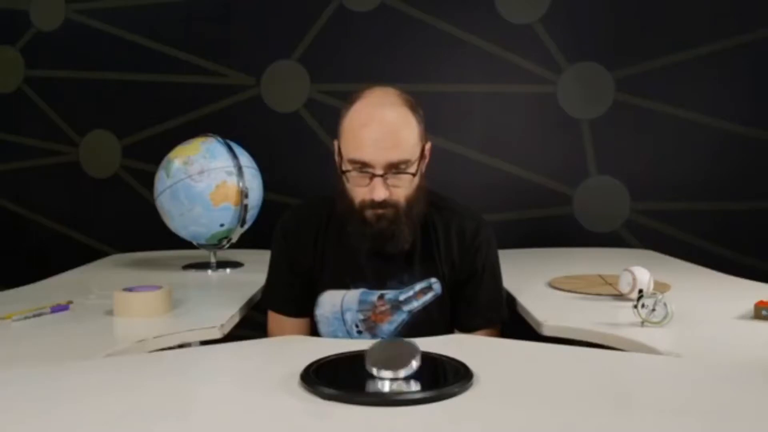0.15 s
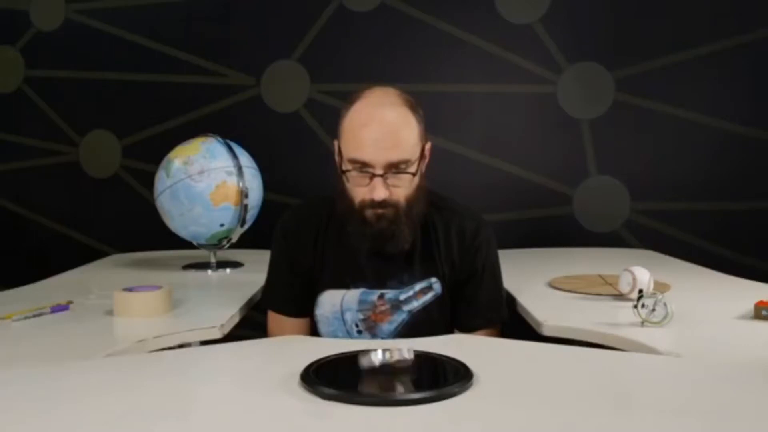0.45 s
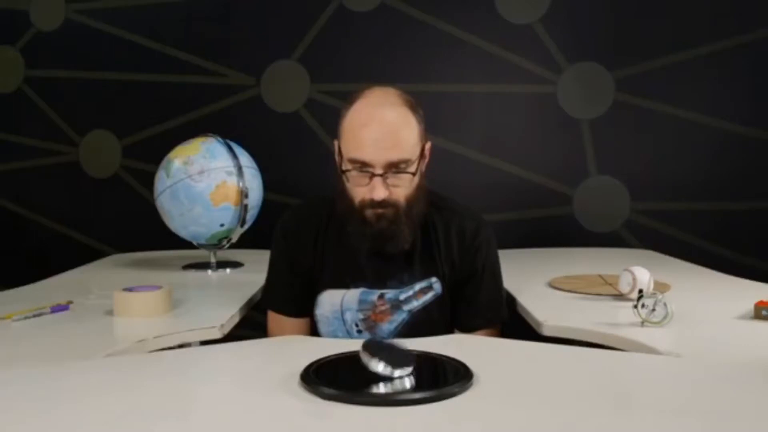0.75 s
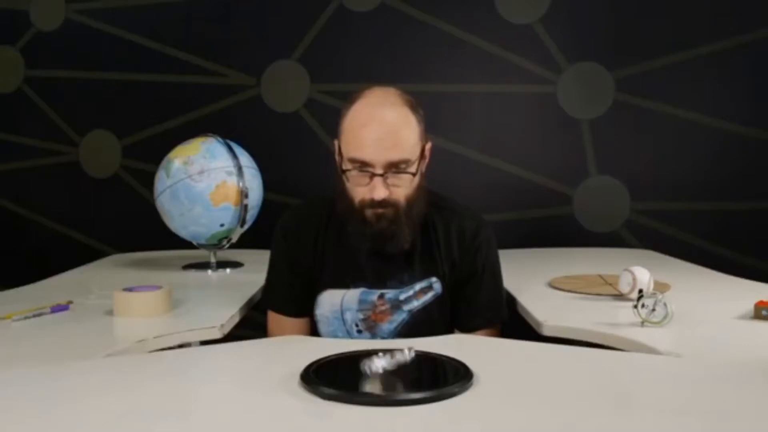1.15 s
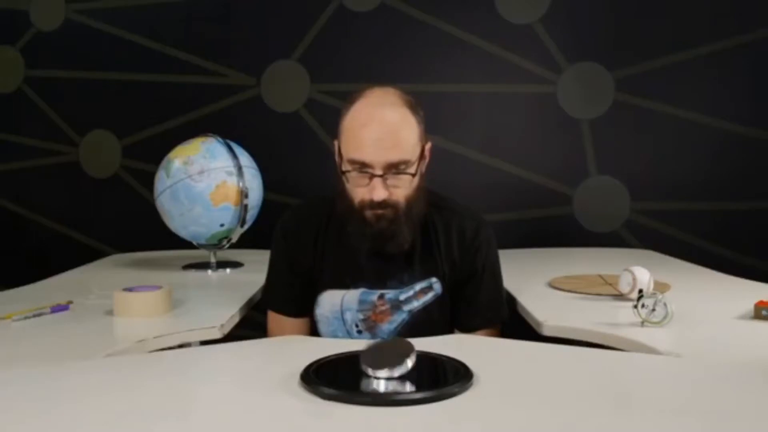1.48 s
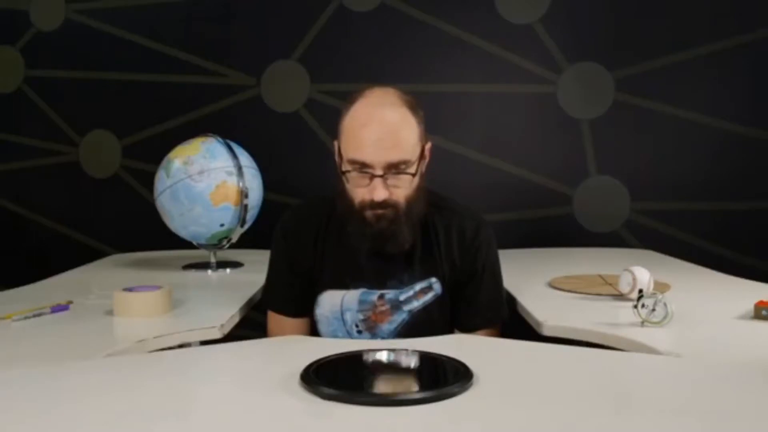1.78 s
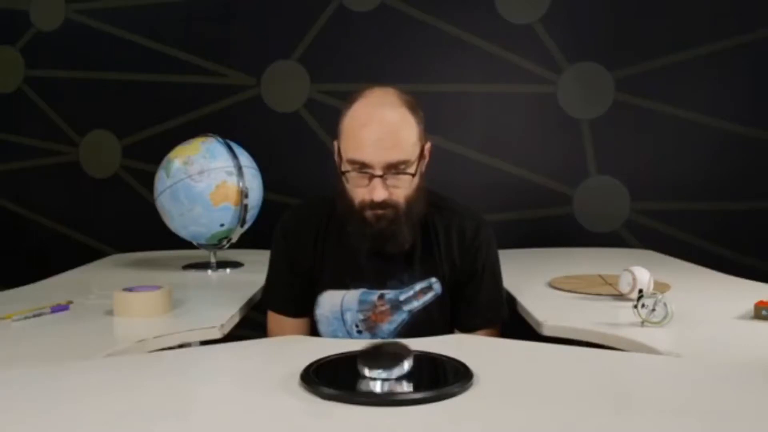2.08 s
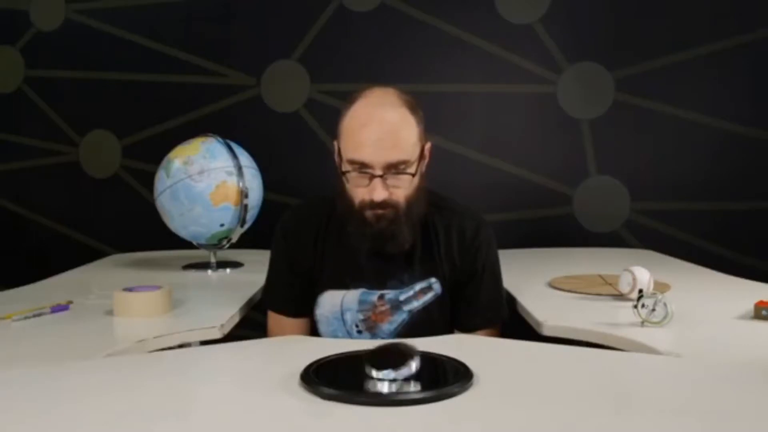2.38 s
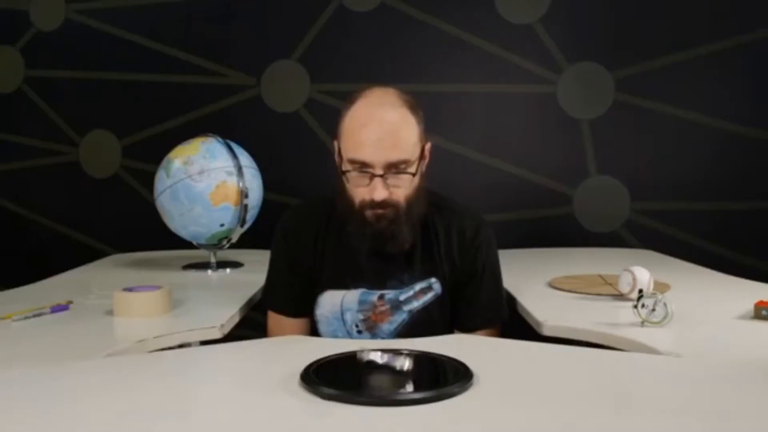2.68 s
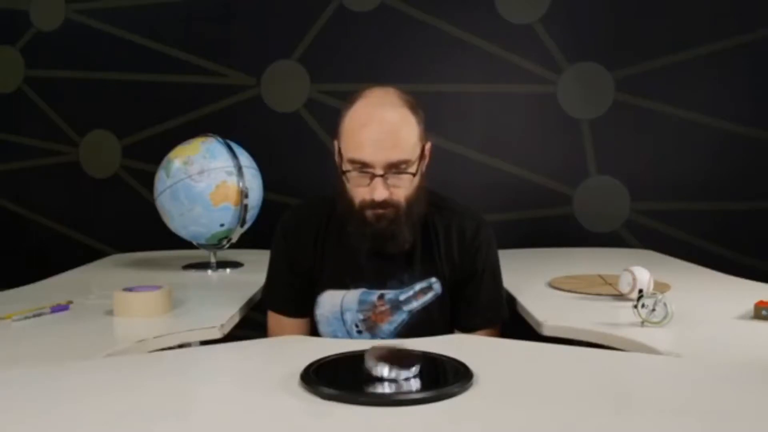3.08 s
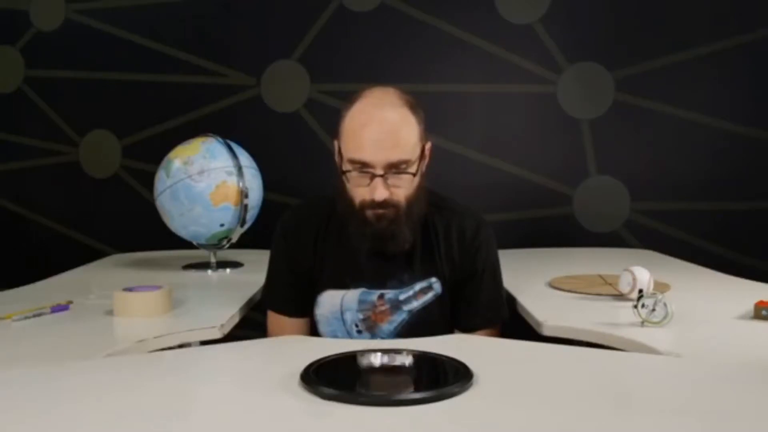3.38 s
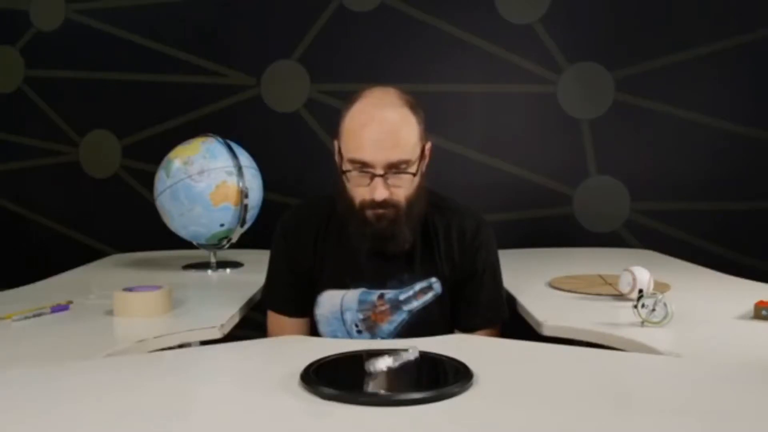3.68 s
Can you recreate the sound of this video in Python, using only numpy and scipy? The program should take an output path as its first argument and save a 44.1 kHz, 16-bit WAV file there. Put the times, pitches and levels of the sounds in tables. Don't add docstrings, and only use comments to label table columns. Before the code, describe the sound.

A heavy metal disc wobbles on a shallow dish, clattering rapidly and evenly over a grainy rolling rumble.

```python
import sys
import numpy as np
from scipy import signal
from scipy.fft import rfft, irfft, next_fast_len
from scipy.io import wavfile

SR = 44100
rng = np.random.default_rng(int(sys.argv[2]) if len(sys.argv) > 2 else 0)


def file_out(sig):
    cols = np.atleast_2d(sig).T
    lim = np.clip(cols, -1, 1)
    pcm = np.round(lim * 32767).astype(np.int16)
    wavfile.write(sys.argv[1], SR, pcm)


def gain_from_db(level_db):
    decades = np.asarray(level_db, float) / 20
    return 10 ** decades


N = 169785

# (time [s], peak [dB], boom of the dish modes near 630 Hz [dB], brightness [dB], chink
# of the disc's 3 kHz modes [dB])
MAIN_KNOCKS = [(0.125, -16, -20, -2.5, 1.5), (0.265, -14.5, -13, 0, 6.5), (0.403, -12.5, -12, -3, 3.5),
               (0.544, -12.5, -8, -4.5, 1), (0.683, -11, 3.5, 0, -4), (0.82, -13, 2, -0.5, 2),
               (0.959, -12.5, 2, -3.5, 3.5), (1.098, -11.5, -5, -9.5, 8), (1.236, -9.5, -9.5, -1, 1.5),
               (1.374, -10.5, -8.5, -3.5, -3), (1.512, -10.5, 4.5, 0, -0.5), (1.65, -10, 4.5, -1, 1),
               (1.787, -11, 2.5, 0.5, 8), (1.924, -8.5, 4, -1.5, 5), (2.058, -10, -2, 4.5, 8.5),
               (2.193, -11.5, -9.5, -0.5, 3.5), (2.326, -11.5, 4, 2, -8), (2.459, -11, 2, 0, 1),
               (2.591, -10, -5.5, 1.5, 6), (2.722, -12, 1, -5.5, 6.5), (2.85, -13, 1.5, -3.5, 4.5),
               (2.977, -12.5, -3.5, -7, 3), (3.103, -13, -12, -1.5, -3), (3.227, -13.5, -11, -7, 3.5),
               (3.352, -15, 4, -2.5, -13), (3.476, -11.5, 6, -6, -6), (3.604, -10.5, -2, -1.5, -1),
               (3.731, -11.5, -2, 3.5, 2.5)]
# (time [s], peak [dB])
DESK_THUD = [
    (0, -38.5),
    (.6, -37.5),
    (1.1, -48.5),
    (1.7, -52.5),
    (2.6, -52.5),
    (3.0, -38.5),
    (3.85, -46.5),
]


def rms_one(x):
    return x / np.sqrt(np.mean(x ** 2) + 1e-20)


def coloured(points, white):
    size = white.shape[-1]
    hz, db = np.transpose(points)
    axis = np.maximum(np.arange(size // 2 + 1) * SR / size, 1)
    gain = gain_from_db(np.interp(np.log(axis), np.log(hz), db))
    return rms_one(irfft(rfft(white) * gain, size))


def drift(rate_hz):
    r = np.exp(-2 * np.pi * rate_hz / SR)
    wander = signal.lfilter([1], [1, -2 * r, r * r], rng.standard_normal(N + SR))
    return rms_one(wander[SR:])


def ring(clicks, hz, t60):
    r = gain_from_db(-60 / (t60 * SR))
    w = 2 * np.pi * hz / SR
    return signal.lfilter([0, np.sin(w)], [1, -2 * r * np.cos(w), r * r], clicks + 1e-18)


def all_modes():
    # (frequency [Hz], level [dB], t60 [s])
    dish = [(363.2, -18.5, 0.11), (434, -15.5, 0.11), (636.8, -1.5, 0.13), (839.6, -9, 0.16),
            (913, -2.5, 0.077), (1006.6, 8, 0.024), (1067, 4.5, 0.043), (1247, -1.5, 0.033),
            (1356, -5.5, 0.083), (1438, -5, 0.039), (1652, -14, 0.067), (2053, 4, 0.023), (2740, -31, 0.01),
            (613, -6, 0.039)]
    # (frequency [Hz]), (level [dB]), (t60 [s])
    disc_hz = [2200, 2680, 2930, 3200, 4100, 4280, 5480, 6300, 6550, 7600, 9000]
    disc_db = [-20, -14.5, -11, -16.5, -11, -15.5, -17.5, -19, -26, -20.5, -28]
    disc_t60 = [.025, .035, .03, .03, .035, .03, .025, .02, .03, .022, .015]
    return dish + list(zip(disc_hz, disc_db, disc_t60))


def room_tone():
    AIR_DB, HUM_HZ, HUM_WIDTH_HZ = -54, 107.3, 5.1
    # (frequency [Hz], level [dB per Hz])
    air_colour = [(20, -5), (45, 1.5), (100, -2.5), (200, -9), (500, -24.5), (11000, -70), (15700, -93)]
    # (time [s], level [dB])
    hum_level = [
        (0, -73),
        (.8, -72),
        (1.0, -51),
        (1.3, -60.5),
        (1.7, -55.5),
        (2.1, -60),
        (3.85, -70),
    ]
    hum = ring(rng.standard_normal(N), HUM_HZ, np.log(1000) / np.pi / HUM_WIDTH_HZ)
    hum_db = np.interp(np.arange(N) / SR, *np.transpose(hum_level))
    air = gain_from_db(AIR_DB) * coloured(air_colour, rng.standard_normal(N))
    return air + gain_from_db(hum_db) * rms_one(hum)


def rolling():
    GRAINS_PER_S, GRAIN_SPREAD_DB, GRIT_CUT_HZ = 1200, 3.5, 12000
    LUMPS_DB, LUMPS_PER_S = 1.2, 60
    RUMBLE_DB, RUMBLE_SWING_DB, RUMBLE_TURN = -0.43, -0.5, 0.037
    HISS_DB, HISS_SWING_DB, HISS_TURN = -6.5, 1.5, 0.055
    SHEEN_DB, SHEEN_SWING_DB, SHEEN_TURN = -26, 4.5, 0.027
    # (time [s], level [dB])
    rim_pressure = [
        (0.0, -41.5),
        (3.53, -40.5),
        (3.85, -41),
    ]
    # (time [s], count [turns])
    wobble_count = [(-.08, -1), (1.226, 8), (2.072, 14), (3.303, 23), (3.876, 27)]
    # (frequency [Hz], level [dB per Hz])
    rim_colour = [(300, -43), (520, -55), (1000, -12.5), (1850, -25.5), (3500, -27), (8800, -49.5),
                  (15700, -89)]
    # (frequency [Hz], level [dB per Hz])
    sheen_colour = [(3000, -42), (5000, -8.5), (7600, -8.5), (8600, -19.5), (12000, -19), (15700, -37)]

    t = np.arange(N) / SR
    turn = np.interp(t, *np.transpose(wobble_count))

    def swell(phase):
        return np.cos(2 * np.pi * (turn - phase))

    rumble = 0
    for hz, db, t60 in all_modes():
        sizes = gain_from_db(GRAIN_SPREAD_DB * np.minimum(rng.exponential(1, N), 4)) * rng.choice([-1, 1], N)
        grains = sizes * (rng.random(N) < GRAINS_PER_S / SR)
        rumble = rumble + gain_from_db(db) * ring(grains, hz, t60)
    rumble = signal.sosfilt(signal.butter(2, GRIT_CUT_HZ, fs=SR, output="sos"), rumble)
    lumps_db = LUMPS_DB * drift(LUMPS_PER_S)
    rumble = rms_one(rumble) * gain_from_db(RUMBLE_DB + lumps_db + RUMBLE_SWING_DB * swell(RUMBLE_TURN))
    hiss_db = HISS_DB + .5 * lumps_db + HISS_SWING_DB * swell(HISS_TURN)
    hiss = coloured(rim_colour, rng.standard_normal(N)) * gain_from_db(hiss_db)
    sheen_db = SHEEN_DB + 1.5 * drift(25) + SHEEN_SWING_DB * swell(SHEEN_TURN)
    sheen = coloured(sheen_colour, rng.standard_normal(N)) * gain_from_db(sheen_db)
    return gain_from_db(np.interp(t, *np.transpose(rim_pressure))) * (rumble + hiss + sheen)


def knocks(rows, rattle_db, crack_db):
    RATTLE_GAP_S, RATTLE_JITTER, CONTACT_S = .0027, .2, 0.0003
    MODE_SPREAD_DB, DETUNE = 2.8, 0.022
    CRACK_T60_S, CRACK_FADE_DB = 0.008, 3.5
    LOAD_SHIFT_DB, LOAD_SHARES = -48.5, [0.067, 1]
    # (frequency [Hz], level [dB per Hz])
    crack_colour = [(200, -6.5), (500, -21), (1000, -7), (2000, -20.5), (4000, -24), (7800, -41.5),
                    (11000, -49.5), (15700, -56)]

    out = np.zeros(N + SR)
    t = np.arange(SR // 7) / SR
    early = SR // 1000
    hz, db, t60 = np.transpose(all_modes())[:, :, None]
    fade_out = np.minimum(1, 4 - 4 * t / t[-1])
    decays = gain_from_db(db - 60 * t / t60) * (1 - np.exp(-t / CONTACT_S)) * fade_out
    slow = hz[:, 0] < 700
    detune = DETUNE * np.where(slow, .3, 1)[:, None]
    spread_db = MODE_SPREAD_DB * np.where(slow, .5, 1)
    for s, peak_db, boom_db, bright_db, chink_db in rows:
        modes = decays * np.sin(2 * np.pi * hz * t * (1 + detune * rng.standard_normal(hz.shape)))
        boom = boom_db * (np.abs(hz - 630) < 100)
        chink = 1.4 * chink_db * (np.abs(hz - 2900) < 450)
        colour_db = (boom + bright_db * (hz > 1900) + chink)[:, 0].astype(float)
        thud_db = np.interp(s, *np.transpose(DESK_THUD))
        colour_db[:2] += np.multiply(LOAD_SHARES, LOAD_SHIFT_DB - thud_db)
        blow, puff = np.zeros((2, 8192))
        for k, contact_db in enumerate(rattle_db):
            lag = early + int(RATTLE_GAP_S * SR * k * (1 + RATTLE_JITTER * rng.uniform(-1, 1)))
            strike_db = np.where(slow, 5.0, contact_db) + spread_db * rng.standard_normal(len(hz))
            puff[lag:lag + len(t)] += gain_from_db(contact_db - CRACK_FADE_DB * k - 60 * t / CRACK_T60_S)
            struck = ~slow | (k == 1)
            blow[lag:lag + len(t)] += (gain_from_db(strike_db + colour_db) * struck) @ modes
        crack = coloured(crack_colour, puff * rng.standard_normal(len(puff)))
        blow += gain_from_db(crack_db + bright_db - 24) * crack
        blow[early + len(t) + 600:] = 0
        i = int(s * SR) - early
        out[i:i + len(blow)] += gain_from_db(peak_db) * blow / np.abs(blow).max()
    return out[:N]


def rocking():
    FAR_BOOM_DB, FAR_CHINK_DB, LIGHT_BOOM_DB, LIGHT_BRIGHT_DB = 7, 3.5, -11.5, -5
    CRACK_DB, SOFT_CRACK_DB, TICK_CRACK_DB = 11, -7.5, 9
    MAIN_RATTLE_DB, FAR_RATTLE_DB = [-0.5, 0.5, -2, -17], [14, 8.5, 4, -13]
    LIGHT_RATTLE_DB, TICK_RATTLE_DB = [1.5, -6.5, -12, -13], [1, -3]
    # (time [s], peak [dB], chink [dB])
    rim_ticks = [(.023, -23, -8), (.106, -25.5, -6), (.135, -28, -4), (.178, -28, -8), (.216, -29, 14),
                 (.223, -25, 0), (.234, -30, -4), (.288, -24, 3), (.365, -26, 1), (.375, -31, -1),
                 (.516, -28, 5), (.76, -22.5, -2), (.919, -27, 1), (1.038, -31, -10), (1.255, -36, -11),
                 (1.32, -29, 15), (1.391, -29, -3), (1.482, -19.5, -6), (1.527, -21.5, 7), (1.618, -27, -4),
                 (1.663, -19, 5), (1.8, -18.5, 2), (1.83, -26, -5), (1.961, -24, -3), (2.02, -20.5, -4),
                 (2.087, -27.5, 9), (2.153, -32, 8), (2.206, -19, 3), (2.287, -24, 7), (2.338, -20, -6),
                 (2.416, -27, -4), (2.424, -26.5, -12), (2.472, -20.5, 10), (2.542, -22.5, -9),
                 (2.551, -25.5, -6), (2.566, -30, -5), (2.61, -18.5, 6), (2.868, -23, 6), (2.998, -23, 9),
                 (3.037, -25, -5), (3.168, -23, 10), (3.252, -28, -4), (3.3, -21.5, -4),
                 (3.429, -18.5, 3.5), (3.491, -31, -8), (3.559, -21, -4)]
    # (time [s], peak [dB], chink [dB])
    rebounds = [(.035, -25.5, -3), (.154, -23, 0), (0.609, -26, -4), (.75, -22, -2), (.888, -23.5, -11),
                (1.025, -31, -6), (1.119, -29, -2), (1.176, -31, -4), (1.935, -19, 11), (2.071, -14, -8),
                (2.217, -22.5, 4), (2.353, -22.5, 2), (2.485, -19.5, 9.5), (2.619, -17, 9),
                (2.752, -14.5, 7.5), (2.871, -13.5, -1), (3.002, -15, -8), (3.015, -21, 2),
                (3.128, -15, -8), (3.142, -21, -6), (3.258, -23, -11), (3.274, -21, -6), (3.404, -25, 3),
                (3.53, -32, -8), (3.749, -19, -8)]
    # (time [s], peak [dB], brightness [dB])
    far_knocks = [(0.066, -21.5, 1), (0.211, -22.5, 3.5), (0.353, -22, 4), (0.496, -22.5, -0.5),
                  (0.638, -19, 4), (0.777, -26.5, 5), (0.912, -24.5, -0.5), (1.06, -22, 1), (1.2, -22, 3),
                  (1.339, -22.5, 1.5), (1.476, -19.5, -2), (1.611, -23.5, -0.5), (1.748, -19.5, -2.5),
                  (1.882, -18.5, -7), (2.015, -21, -2), (2.145, -19.5, -4), (2.275, -19.5, -3),
                  (2.403, -17.5, 0.5), (2.528, -20.5, 0.5), (2.657, -17.5, -8), (2.785, -20, -5.5),
                  (2.914, -20.5, -1.5), (3.043, -18.5, -0.5), (3.176, -24, 2), (3.306, -23, 3.5),
                  (3.436, -23.5, 11), (3.566, -23.5, 14), (3.695, -23, 6), (3.823, -24.5, 0)]
    # (time [s], peak [dB], chink [dB])
    touches = [(0.247, -25, -8), (0.387, -24.5, -6), (0.527, -20.5, -1), (.667, -21.5, -8),
               (0.808, -21, -4), (0.947, -29, -2), (1.087, -27, 4), (1.227, -17.5, 9), (1.365, -20, 10),
               (1.503, -20.5, 6), (1.64, -19, 4), (1.778, -20, 6), (1.915, -21, 8), (2.05, -15, 4),
               (2.184, -15, 3), (2.317, -18, -4), (2.448, -23, -9), (2.578, -25, -4), (2.707, -22.5, -2),
               (2.742, -18, 9.5), (2.884, -19, -4), (3.085, -29, -7), (3.212, -21, -6), (3.336, -20, -2),
               (3.464, -24, -10), (3.591, -20, -5), (3.72, -21.5, -4)]

    def lightly(rows):
        return [(s, db, LIGHT_BOOM_DB, LIGHT_BRIGHT_DB, chink) for s, db, chink in rows]

    far = [(s, db, FAR_BOOM_DB, bright, FAR_CHINK_DB) for s, db, bright in far_knocks]
    soft_db = CRACK_DB + SOFT_CRACK_DB
    out = knocks(MAIN_KNOCKS, MAIN_RATTLE_DB, CRACK_DB)
    out = out + knocks(far, FAR_RATTLE_DB, soft_db)
    out = out + knocks(lightly(touches + rebounds), LIGHT_RATTLE_DB, soft_db)
    return out + knocks(lightly(rim_ticks), TICK_RATTLE_DB, soft_db + TICK_CRACK_DB)


def radiate(x):
    LOW_CUT_HZ, HOLLOW_HZ, HOLLOW_WIDTH_HZ, SOFT_HZ = 339, 508.7, 156, 12600
    x = signal.sosfilt(signal.butter(4, LOW_CUT_HZ, "high", fs=SR, output="sos"), x)
    x = signal.sosfilt(signal.butter(2, SOFT_HZ, fs=SR, output="sos"), x)
    return signal.lfilter(*signal.iirnotch(HOLLOW_HZ, HOLLOW_HZ / HOLLOW_WIDTH_HZ, SR), x)


def thuds():
    THUD_HZ, THUD_T60_S, THUD_RISE_S = 194, 0.051, 0.00053
    out = np.zeros(N + SR)
    t = np.arange(SR // 5) / SR
    envelope = gain_from_db(-60 * t / THUD_T60_S) * (1 - np.exp(-t / THUD_RISE_S))
    thud = envelope * np.sin(2 * np.pi * THUD_HZ * t)
    for s in np.array(MAIN_KNOCKS)[:, 0]:
        i = int(s * SR)
        out[i:i + len(t)] += gain_from_db(np.interp(s, *np.transpose(DESK_THUD))) * thud
    return out[:N]


def room(x):
    ROOM_T60_S, WALL_CUT_HZ = 0.22, 960
    size = next_fast_len(N + SR)
    w = 2 * np.pi * np.arange(size // 2 + 1) / size
    dull = 1 / (1 + 1j * w * SR / (2 * np.pi * WALL_CUT_HZ))
    echoes = 0
    for lag in rng.uniform(.011, .04, 8):
        loop = gain_from_db(-60 * lag / ROOM_T60_S) * dull * np.exp(-1j * w * lag * SR)
        echoes = echoes + loop / (1 - loop)
    return irfft(rfft(x, size) * echoes, size)[:N]


def scene():
    ROOM_DB = -22
    desk = radiate(rocking() + rolling()) + thuds()
    return (desk + gain_from_db(ROOM_DB) * room(desk) + room_tone())[None]


def roll_off(x):
    return signal.sosfilt(signal.butter(12, 15700, fs=SR, output="sos"), x)


def record(dry):
    CUTOFF_HZ = 15950
    mix = signal.sosfilt(signal.cheby2(20, 40, CUTOFF_HZ, fs=SR, output="sos"), dry)
    return roll_off(mix)


dry = scene()
out = record(dry)
file_out(out)
```